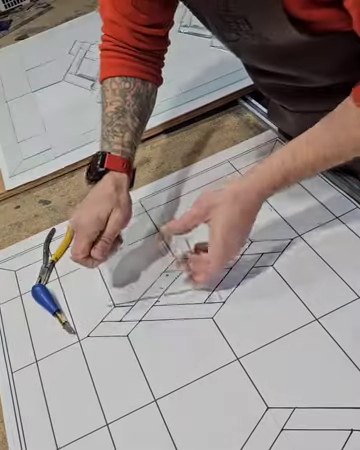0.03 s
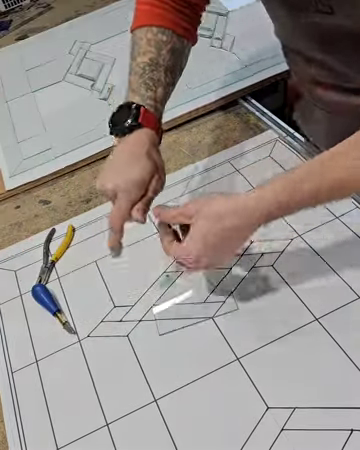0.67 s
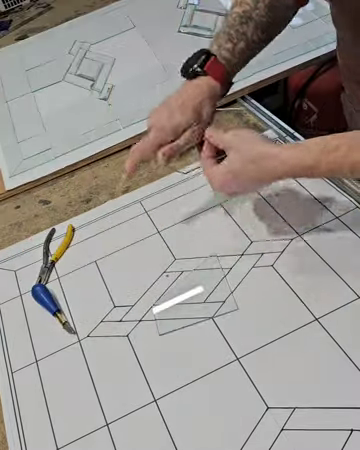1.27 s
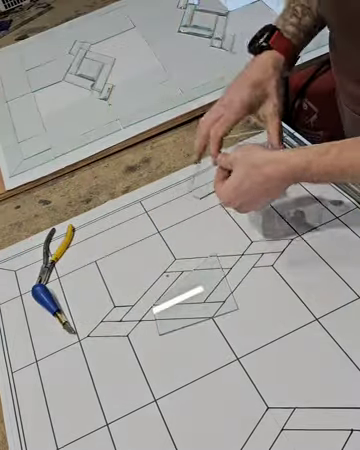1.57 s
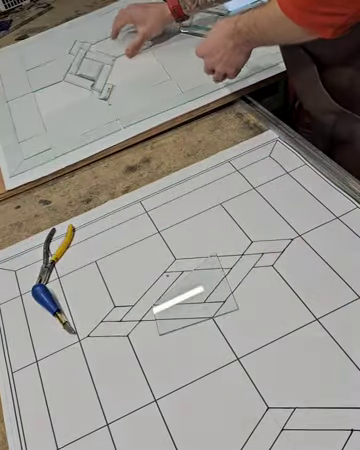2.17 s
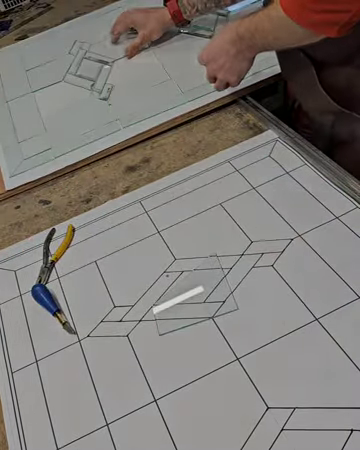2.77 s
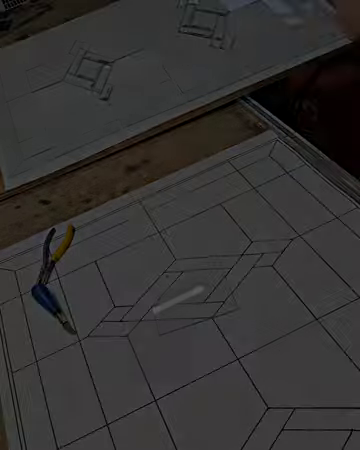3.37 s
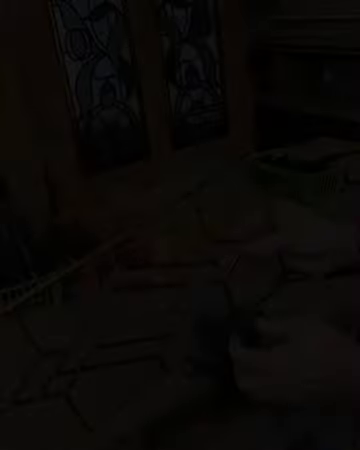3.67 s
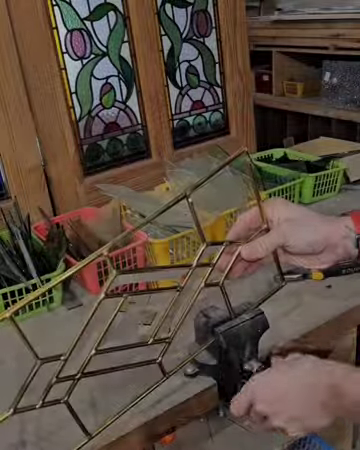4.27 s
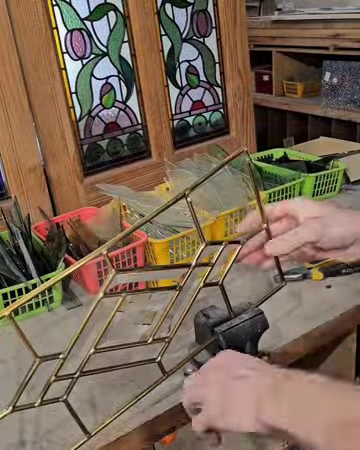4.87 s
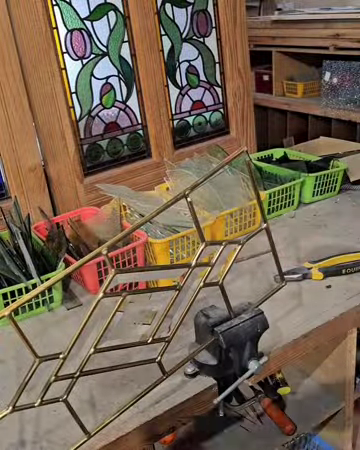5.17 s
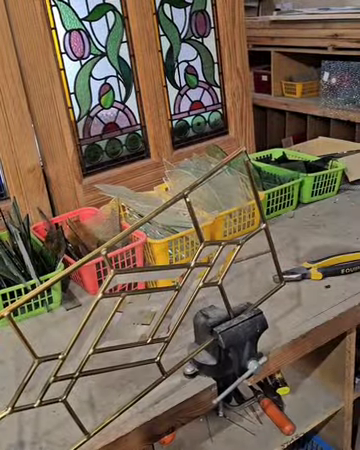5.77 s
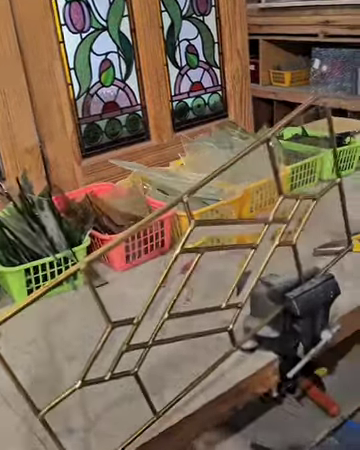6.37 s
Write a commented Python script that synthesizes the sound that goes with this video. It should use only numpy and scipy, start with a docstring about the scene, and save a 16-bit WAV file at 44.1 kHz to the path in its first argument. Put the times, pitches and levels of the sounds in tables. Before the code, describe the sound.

Small glass pieces click on a workbench, then a vice screw spins with a growing gritty rumble and its metal handle clacks.

```python
"""Small cut pieces of glass click against each other, close up, and knock on a pane lying on the bench
of a stained-glass workshop; then they are nudged into place further off. The sound fades out, and in on
a bench vice: its screw is spun open with a growing rumble, the handle drops with a clack, and a brass
frame scrapes out of the jaws. Struck or rubbed, each object rings with its own modes; the screw judders
in its nut and shakes the bench. Room air lies under both scenes, heard on a phone's two microphones."""
import sys
import numpy as np
from scipy import signal
from scipy.fft import rfft, irfft, next_fast_len
from scipy.io import wavfile

SR = 44100
rng = np.random.default_rng(int(sys.argv[2]) if len(sys.argv) > 2 else 0)


def transcribe(signal):
    """Save signal, clipped to [-1, 1], as a 16-bit WAV file at the path in sys.argv[1]."""
    frames = np.atleast_2d(signal).T
    limited = np.clip(frames, -1, 1)
    pcm = np.round(limited * 32767).astype(np.int16)
    wavfile.write(sys.argv[1], SR, pcm)


N = 283563
TIME = np.arange(N) / SR
CHANGE_S = 3.664  # silence between glass table and vice; all levels are set ahead of the fades
LET_GO_S = 5.5  # the hand leaves the spinning screw

# hiss of the vice's dry thread: (frequency [Hz], level [dB per Hz])
THREAD_SPECTRUM = [(710, -21), (1200, 4), (1430, -4.5), (2230, -3), (2510, -11.5), (2980, -1), (3830, -8),
                   (4600, -11), (5530, -11.5), (6030, -10), (7250, -13), (8350, -18), (12300, -30),
                   (15200, -48), (16000, -37)]


def glass_clicks(out):
    """Glass meets glass: a sharp edge, the ring of the piece, and a knock on what lies under it."""
    # (time [s], piece, ring energy [dB], edge energy [dB], support, knock energy [dB], pan [dB])
    hits = [(0.3148, "chip", 8.5, 3, "board", -21, 2.5), (0.4396, "pane", -8, -18.5, "board", 5, 2),
            (.500, "pane", 9, -21.5, "bench", 6.5, 6.5), (.534, "strip", 6.5, -7.5, "board", 4.5, 1.5),
            (0.9442, "bevel", 7.5, -1, "board", -16.5, 4), (2.2166, "far piece", -16, -24, "bench", -30, 3),
            (2.428, "far piece", -13.5, -27, "bench", -31, 2)]
    for s, piece, db, edge_db, support, knock_db, pan_db in hits:
        add(out, s, undb(db) * ring(piece) + undb(edge_db) * glass_edge(), pan_db)
        add(out, s, undb(knock_db) * ring(support))


def glass_edge(t60=0.008):
    """The first instant of glass on glass, before the piece rings; energy 1."""
    # the sharp contact: (frequency [Hz], level [dB per Hz])
    spectrum = [(500, -4), (850, 0), (1300, -9.5), (2500, 1.5), (4000, -3), (6300, 1), (9000, -6.5),
                (15000, -14)]
    t = np.arange(SR // 5) / SR
    return unit(colour(diffuse(len(t)), spectrum) * fall(t, t60)) / np.sqrt(len(t))


def ring(name, phase_spread=1.05, grip=0.0024):
    """An object's answer to one contact, energy 1: its modes and a crack of weaker ones around them."""
    # resonances, by object: (frequency [Hz], level [dB], t60 [s])
    modes_of = { "chip": [(1402, 0, 0.015), (2110, 2, 0.016), (2420, 1.5, 0.018), (2635, 3.5, 0.014),
                (3350, -6, 0.02), (3780, -2, 0.023), (4000, -2, .022), (4300, -4, .016),
                (4900, -4.5, 0.0092), (5500, -2, 0.028), (5650, -4.5, 0.026), (6160, 2, 0.014),
                (7260, -2, 0.015), (8170, -7.5, 0.011), (9160, -6.5, 0.0056), (11900, -13, .012),
                (13800, -9.5, .013), (15000, -14, .012)], "bevel": [(595, -5.5, 0.015), (1600, -7.5, 0.028),
                (1927, -5, 0.022), (2356, 3.5, .02), (2475, -3.5, 0.024), (2890, 0.5, 0.015),
                (3497, 1, 0.024), (3790, 4, 0.019), (4170, 0.5, 0.016), (5310, -0.5, 0.011),
                (5670, 1, 0.011), (6200, -7, .012), (7200, 2, 0.01), (7560, -5, 0.015), (8700, -4, 0.0136),
                (9020, -3, 0.0085), (9750, -12, 0.011), (11200, -9, 0.0093), (14800, -14, .01)],
                "pane": [(637, -3.5, 0.0093), (713, -3.5, 0.043), (1060, -10, 0.024), (1256, -5.5, 0.077),
                (1360, 1, 0.033), (1527, 0, .04), (1663, -1.5, 0.11), (2240, -11.5, .06),
                (2940, -8.5, 0.017), (3300, -12, 0.08), (4080, -10, 0.095), (5600, -26, 0.064),
                (6600, -26, 0.05), (7750, -19.5, 0.026), (8400, -28.5, .04)], "strip": [(1530, 3, 0.032),
                (2130, -1, 0.041), (2850, -6.5, .04), (3300, -3.5, 0.03), (3481, -0.5, 0.017),
                (4400, -4.5, 0.022), (4840, -1, 0.016), (5550, -8, 0.015), (6420, -3, 0.021),
                (7000, -2, 0.019), (7280, -7.5, 0.027), (7905, -12.5, 0.021), (8700, -10, 0.034),
                (11600, -19.5, 0.018), (15000, -18.5, .02)], "far piece": [(1357, 0.5, 0.075),
                (1404, -6, 0.11), (2700, -1.5, 0.14), (3050, -1, 0.032), (3726, 5, 0.039),
                (4430, -6, 0.072), (5510, -3.5, 0.075), (6150, -1.5, 0.037), (6420, 0, 0.03),
                (8200, -14, .06), (8800, -13, 0.084), (11000, -15, 0.046), (15200, -17, .05)],
                "bench": [(157, -7, 0.15), (208.8, -1.5, 0.18), (267, -1, .08), (330, -8.5, .08),
                (518, -6.5, 0.1), (629.6, -5.5, 0.087)], "board": [(224, -2.5, .1), (335.3, -3.5, 0.11),
                (396.4, -5, 0.13), (470, 3, .06), (509, 1, .12)], "vice": [(630, 7, 0.021), (880, 2, 0.013),
                (1590, -3, 0.013), (1730, 2, 0.021), (2292, 9, 0.021), (2454, 4, 0.037), (3180, -1, 0.011),
                (4147, -10.5, 0.062), (4740, -9, 0.062), (5480, -2, 0.038), (6300, -5.5, 0.035),
                (7040, -9.5, .03), (7980, -10.5, 0.061), (10050, -14, 0.041), (11100, -14, 0.051),
                (13200, -16, .02)], "frame": [(1482, 3.5, 0.046), (2503, -8.5, 0.077), (3010, -6.5, 0.048),
                (3624, -2.5, 0.043), (4260, -10, 0.046), (7900, -8.5, .05), (9260, -12.5, 0.12),
                (11500, -13.5, 0.11)], "jaw edge": [(1420, 1.5, 0.079), (2320, 2, 0.062),
                (3700, 4.5, 0.044), (4970, 5.5, 0.042), (5900, 0.5, 0.025), (6860, 2, 0.021),
                (7700, 3.5, 0.04), (9200, 1.5, 0.032), (11200, -1, 0.064), (11900, 7, 0.049),
                (13400, -8.5, .04), (14500, 2, .04), (15800, -2, 0.032)], }
    # the contact, by object: (crack against the modes [dB], crack t60 [s], rise [s])
    contact = {"chip": (-8.5, 0.026, 0.00024), "bevel": (-1, 0.012, .0004), "pane": (-10, 0.033, 0.00039),
               "strip": (-6.5, .04, .0003), "far piece": (-0.42, 0.12, 0.00043),
               "bench": (-6.5, .06, 0.00019), "board": (-6.5, 0.14, .0004), "vice": (-1, 0.04, 0.0017),
               "frame": (0.7, 0.093, 0.00031), "jaw edge": (9.3, 0.024, 0.00011)}
    t = np.arange(SR // 5) / SR
    hz, db, t60 = np.transpose(modes_of[name])
    crack_db, crack_t60, rise_s = contact[name]
    hz = hz * (1 + grip * rng.standard_normal(len(hz)))  # the way it is held shifts each mode a little
    phase = rng.uniform(0, 2 * np.pi, len(hz))
    # short waves reach the two microphones in different phase
    phase = phase + phase_spread * np.minimum(hz / 900, 1) * rng.standard_normal((2, len(hz)))
    waves = np.sin(2 * np.pi * hz[:, None] * t + phase[..., None])
    modes = (undb(db)[:, None] * fall(t, t60[:, None]) * waves).sum(axis=1)
    skirt = [(hz[0] / 4, db[0] - 18.5), *sorted(zip(hz, db)), (hz[-1] * 2, db[-1] - 16.5)]
    crack = colour(diffuse(len(t)), skirt) * fall(t, crack_t60)
    sound = (unit(modes) + undb(crack_db) * unit(crack)) * (1 - np.exp(-t / rise_s))
    return unit(sound) / np.sqrt(len(t))


def vice_knocks(out):
    """Metal and wood are struck at the vice and ring; the hardest knock is the handle dropping."""
    # (time [s], object struck, energy [dB], pan [dB])
    knocks = [(3.779, "frame", -15, 0), (3.781, "board", -3.5, 4), (3.887, "bench", -5, -8),
              (3.886, "vice", -17, 0), (3.969, "jaw edge", -36, 6), (4.057, "board", -16, -2),
              (4.266, "strip", -20, 1), (4.889, "vice", -21.5, 1.5), (5.338, "jaw edge", -15, 0),
              (5.596, "strip", -23, -1), (5.677, "vice", 1, -2), (5.716, "vice", -5, -5),
              (5.766, "vice", -14, -2), (6.012, "jaw edge", -22, 5.5), (6.054, "jaw edge", -24, 5),
              (6.08, "jaw edge", -20.5, 3), (6.145, "frame", -12.5, 2.5), (6.198, "jaw edge", -18, 9),
              (6.356, "jaw edge", -23.5, 1)]
    for s, name, db, pan_db in knocks:
        add(out, s, undb(db) * ring(name), pan_db)


def scrapes(out, slips_per_s=2500, spread_db=4.5):
    """Sliding pieces stick and slip: a swell of tiny contacts, each ringing the object."""
    # (time [s], length [s], object rubbed, level [dB], pan [dB])
    slides = [(0.46, 0.12, "strip", -53.5, -12), (1.957, 0.096, "chip", -70, 3),
              (1.991, .15, "bench", -48, 1.5), (2.04, 0.11, "bevel", -65, 2.5),
              (2.226, 0.075, "far piece", -65.5, 4), (2.349, 0.043, "far piece", -63.5, 1.5),
              (2.389, 0.036, "far piece", -46, 8.5), (2.572, 0.051, "far piece", -66.5, 3),
              (2.615, 0.022, "far piece", -53, 5), (3.036, 0.04, "chip", -63, 1.5),
              (3.40, 0.072, "chip", -52, -0.5), (5.185, 0.21, "jaw edge", -54, -1),
              (5.286, 0.17, "vice", -50.5, -3.5), (5.721, 0.091, "vice", -47.5, -2.5),
              (5.975, 0.19, "jaw edge", -59, 0), (6.129, 0.034, "frame", -43, 1.5),
              (6.191, 0.041, "jaw edge", -44.5, 2.5), (6.23, 0.16, "jaw edge", -50, 1),
              (6.404, 0.055, "jaw edge", -48, 3)]
    for s, length, name, db, pan_db in slides:
        push = swell(length)
        slips = unit(grains(slips_per_s, spread_db, size=SR)[:len(push)] * push)
        add(out, s, undb(db) * signal.fftconvolve(slips[None], ring(name), axes=1), pan_db)


def screw(shake_db=-34.5, shake_db_per_s=5, hiss_db=-49.5, hiss_db_per_s=3.5, run_down_s=0.14):
    """Spun ever harder until let go, the screw judders and shakes the bench; its gritty thread hisses."""
    # the shaken bench: (frequency [Hz], level [dB per Hz])
    body = [(65, -30), (110, -8), (279, -2.5), (335, -6), (366, -11), (446, -10), (626, -14), (690, -22),
            (850, -19.5), (948, -26.5), (1290, -31.5), (1500, -66), (1950, -62), (3300, -120)]
    until_let_go = np.maximum(LET_GO_S - TIME, 0)
    turning = np.clip(1 - (TIME - LET_GO_S) / run_down_s, 0, 1)
    judder = undb(2 * walk(60))
    shake = colour(diffuse(N) * judder, body)
    hiss = colour(diffuse(N) * np.sqrt(judder), THREAD_SPECTRUM)
    t = np.arange(SR // 40) / SR
    specks = grains(rate=69, spread_db=2.6)
    tick = diffuse(len(t)) * fall(t, t60=0.01)
    grit = colour(signal.fftconvolve(specks[None], tick, axes=1)[:, :N], THREAD_SPECTRUM)
    shake_gain = undb(shake_db - shake_db_per_s * until_let_go)
    hiss_gain = undb(hiss_db - hiss_db_per_s * until_let_go)
    return turning * (shake_gain * shake + hiss_gain * (hiss + undb(-8) * grit))


def thread_ticks(rate=22, tick_db=-31, spread_db=2.0):
    """Larger bits of grit crack in the thread until the screw is let go."""
    t = np.arange(SR // 40) / SR
    tick = unit(colour(diffuse(len(t)), THREAD_SPECTRUM) * fall(t, t60=0.023)) / np.sqrt(len(t))
    bits = grains(rate, spread_db) * (TIME > CHANGE_S) * (TIME < LET_GO_S)
    return undb(tick_db) * signal.fftconvolve(bits[None], tick, axes=1)[:, :N]


def body_thumps(out):
    """Hands and body bump softly against the bench."""
    # (time [s], length [s], level [dB])
    thumps = [(0.08, 0.17, -46), (1.783, 0.041, -42), (2.03, 0.14, -40.5), (3.04, 0.029, -25),
              (3.08, 0.18, -45), (3.88, 0.026, -35.5)]
    # a dull thud: (frequency [Hz], level [dB per Hz])
    spectrum = [(18, -32.5), (30, -16), (95, 3.5), (314, -21), (403, -42.5), (902, -33), (1000, -57),
                (1300, -86), (2200, -120)]
    add_swells(out, thumps, spectrum)


def sleeves(out):
    """Sleeves brush faintly past."""
    # (time [s], length [s], level [dB])
    brushes = [(0, 0.072, -76), (1.3, 0.091, -76.5), (1.48, 0.13, -74.5), (5.8, .07, -62)]
    # hiss of cloth: (frequency [Hz], level [dB per Hz])
    spectrum = [(4000, -5), (8000, -6.5), (9800, 3), (11000, -13), (15000, -12)]
    add_swells(out, brushes, spectrum)


def workshop(x, early_db=-14, early_t60=0.046, tail_db=-13, gap_s=0.0037):
    """Add quick reflections off the bench and the body, then a short tail whose top dies first."""
    # decay of the room: (frequency [Hz], t60 [s])
    room_t60 = [(200, 0.28), (1000, 0.29), (3500, 0.35), (7000, 0.24), (13000, .22)]
    t = np.arange(SR // 2) / SR
    hz = np.fft.rfftfreq(len(t), 1 / SR)
    noise = rfft(diffuse(len(t)))
    tail = 0
    for centre, t60 in room_t60:
        share = at_hz([(f, float(f == centre)) for f, _ in room_t60], hz)
        tail = tail + irfft(noise * share, len(t)) * fall(t, t60)
    arrival = np.clip(t / gap_s - 1, 0, 1)
    early = diffuse(len(t)) * fall(t, early_t60)
    echo = undb(early_db) * unit(early * arrival) + undb(tail_db) * unit(tail * arrival)
    return x + signal.fftconvolve(x, echo / np.sqrt(len(t)), axes=1)[:, :N]


def table_room(air_db=-49.5, hum_db=-53, hum_hz=79.3, waver_db=4.0):
    """Room tone at the glass table: steady air and a wavering low hum."""
    # the air: (frequency [Hz], level [dB per Hz])
    spectrum = [(15, -37), (25, -13.5), (80, -3.5), (161, -15.5), (229, -12), (405, -21.5), (439, -18),
                (641, -21), (754, -22.5), (840, -23.5), (2220, -37.5), (5000, -55), (9570, -61.5),
                (16000, -72.5)]
    air = undb(air_db + walk(11)) * colour(diffuse(N), spectrum)
    hum_gain = undb(hum_db + waver_db * walk(17))
    hum_phase = 2 * np.pi * np.cumsum(hum_hz + 3.5 * walk(25)) / SR
    return air + hum_gain * unit(np.sin(hum_phase))


def vice_room(air_db=-46, air_db_per_s=3.5, rumble_db=-43.0, rumble_db_per_s=3.0):
    """Room tone at the vice: brighter air and an uneven rumble, growing until the screw is let go."""
    # the air: (frequency [Hz], level [dB per Hz])
    air_spectrum = [(71, -55), (120, -1), (209, -0.5), (370, -12.5), (605, -10.5), (892, -19), (1090, -20),
                    (1900, -26), (6240, -35.5), (10400, -44.5), (16000, -41)]
    # the low rumble: (frequency [Hz], level [dB per Hz])
    rumble_spectrum = [(12, -34), (20, -14), (38, -4.5), (54, 2.5), (91, 1), (128, -12.5), (200, -10),
                       (260, -47), (440, -120)]
    until_let_go = np.maximum(LET_GO_S - TIME, 0)
    air = undb(air_db - air_db_per_s * until_let_go + walk(11)) * colour(diffuse(N), air_spectrum)
    rock_db = 8 * np.exp(-((TIME - 5.54) / 0.21) ** 2)  # the bench rocks as the jaws come loose
    rumble_gain = undb(rumble_db - rumble_db_per_s * until_let_go + rock_db - walk(6.9))
    return air + rumble_gain * colour(diffuse(N), rumble_spectrum)


def add(out, s, sound, pan_db=0):
    """Mix a stereo sound in at time s; positive pan leans left, the treble further than the bass."""
    # the phone shades its far microphone: (frequency [Hz], left minus right [multiple of pan])
    shadow = [(200, 0.2), (1200, 1.25), (3000, 0.65), (9000, 1.56)]
    margin = SR // 50
    size = next_fast_len(sound.shape[1] + 2 * margin)
    lean_db = pan_db * at_hz(shadow, np.fft.rfftfreq(size, 1 / SR))
    padded = np.pad(sound, ((0, 0), (margin, 0)))
    panned = irfft(rfft(padded, size) * undb(np.array([lean_db, -lean_db]) / 2), size)
    start = int(s * SR)
    part = panned[:, margin:margin + max(N - start, 0)]
    out[:, start:start + part.shape[1]] += part


def add_swells(out, events, spectrum):
    """Mix in one swell of coloured noise for each event."""
    for s, length, db in events:
        push = swell(length)
        add(out, s, undb(db) * colour(diffuse(SR // 2), spectrum)[:, :len(push)] * push)


def from_right(x, lag_s=0.00028):
    """Sound from the right reaches the left microphone later."""
    return np.array([np.roll(x[0], int(lag_s * SR)), x[1]])


def diffuse(size):
    """Stereo noise, alike at both microphones in the bass and unrelated in the treble."""
    # width of diffuse sound: (frequency [Hz], side minus mid [dB])
    width = [(50, -24), (125, -19), (250, -12.5), (600, -4.5), (1500, 0), (12000, -2.5)]
    padded = next_fast_len(size)
    mid, side = rng.standard_normal((2, padded))
    side = irfft(rfft(side) * undb(at_hz(width, np.fft.rfftfreq(padded, 1 / SR))), padded)
    return unit(np.array([mid + side, mid - side])[:, :size])


def colour(x, spectrum):
    """Filter by a spectrum that falls steeply beyond its ends; rms 1."""
    size = next_fast_len(x.shape[-1])
    hz = np.fft.rfftfreq(size, 1 / SR)
    inside = np.minimum(1, hz / spectrum[0][0]) * np.minimum(1, spectrum[-1][0] / (hz + 1))
    shaped = rfft(x, size) * undb(at_hz(spectrum, hz)) * inside ** 4
    return unit(irfft(shaped, size)[..., :x.shape[-1]])


def grains(rate, spread_db, size=N):
    """About `rate` tiny slips a second at random moments, a few much larger than the rest."""
    chance, strength, sign = rng.random(size), rng.exponential(size=size), rng.choice([-1, 1], size)
    return sign * (chance < rate / SR) * undb(spread_db * np.minimum(strength, 4))


def walk(rate):
    """A random drift through `rate` points a second."""
    steps = TIME * rate
    count = int(steps[-1]) + 2
    return np.interp(steps, np.arange(count), rng.standard_normal(count))


def swell(length):
    """A rounded rise and fall lasting `length` seconds."""
    return np.sqrt(np.hanning(int(length * SR)))


def fall(t, t60):
    """Exponential decay, 60 dB down at t60."""
    return np.exp(-np.log(1000) * t / t60)


def at_hz(points, hz):
    """Read (Hz, value) points on a log-frequency axis."""
    f, value = np.transpose(points)
    return np.interp(np.log(np.maximum(hz, 1)), np.log(f), value)


def undb(db):
    """Decibels to gain."""
    return 10 ** (np.asarray(db) / 20)


def unit(x):
    """Scale to rms 1."""
    return x / np.sqrt(np.mean(x ** 2))


def scene(fade_out_s=2.62, fade_in_s=1.34):
    """The work at the glass table fades out, the work at the vice fades in from the right."""
    work = np.zeros((2, N))
    for source in glass_clicks, vice_knocks, scrapes, body_thumps, sleeves:
        source(work)
    work = workshop(work)
    at_table = work + table_room()
    at_vice = from_right(work + screw() + thread_ticks() + vice_room())
    fade_out = np.clip((CHANGE_S - TIME) / fade_out_s, 0, 1) ** 1.22
    fade_in = np.clip((TIME - CHANGE_S) / fade_in_s, 0, 1) ** 0.62
    return fade_out * at_table + fade_in * at_vice


def record(dry, top_hz=16000):
    """The phone holds peaks at full scale and cuts the top."""
    low_pass = signal.ellip(8, .2, 70, top_hz, fs=SR, output="sos")
    return signal.sosfilt(low_pass, np.clip(dry, -1, 1))


dry = scene()
out = record(dry)
transcribe(out)
```